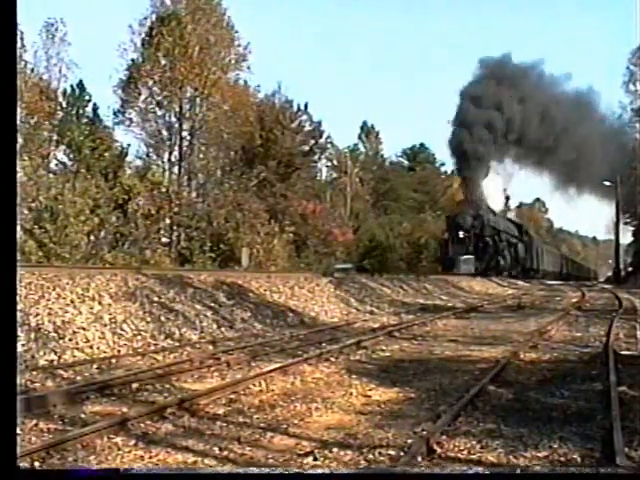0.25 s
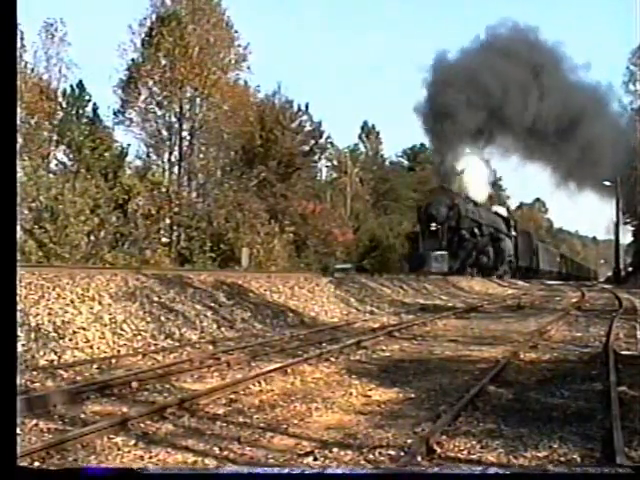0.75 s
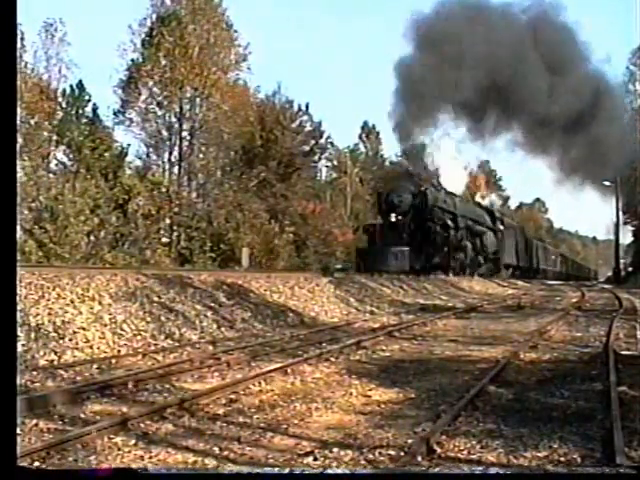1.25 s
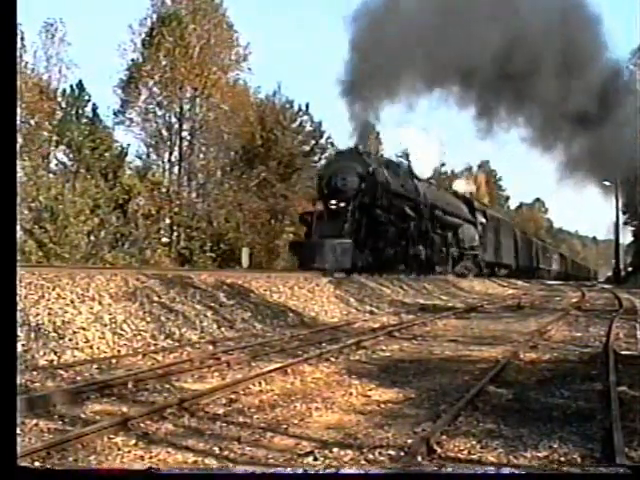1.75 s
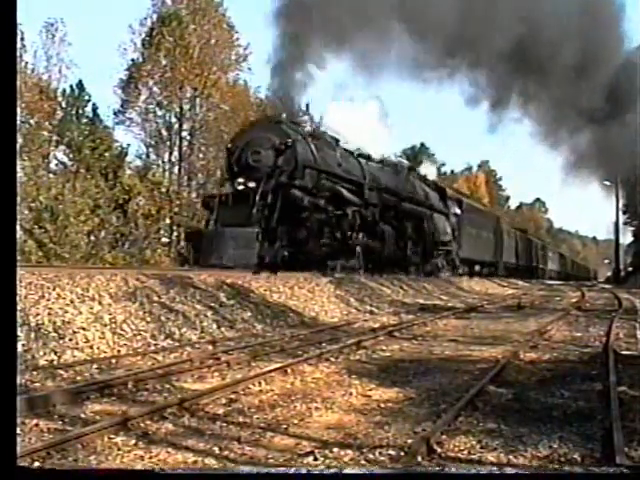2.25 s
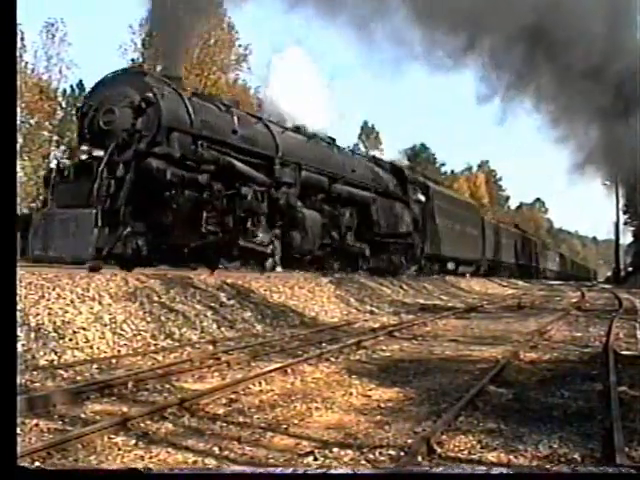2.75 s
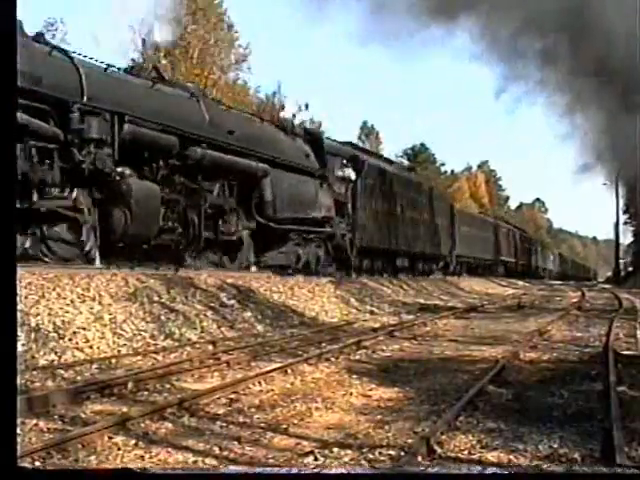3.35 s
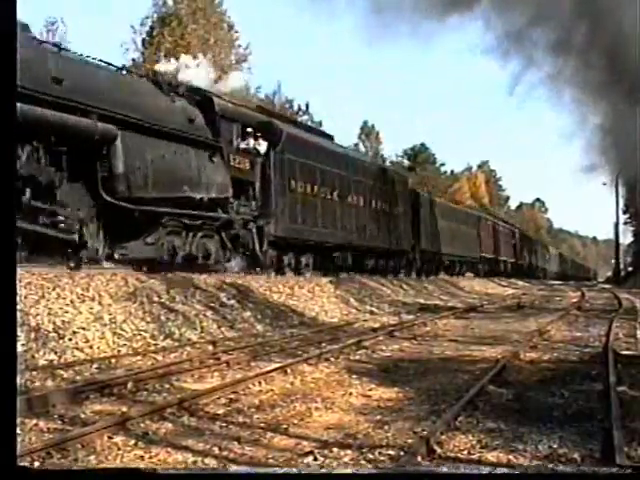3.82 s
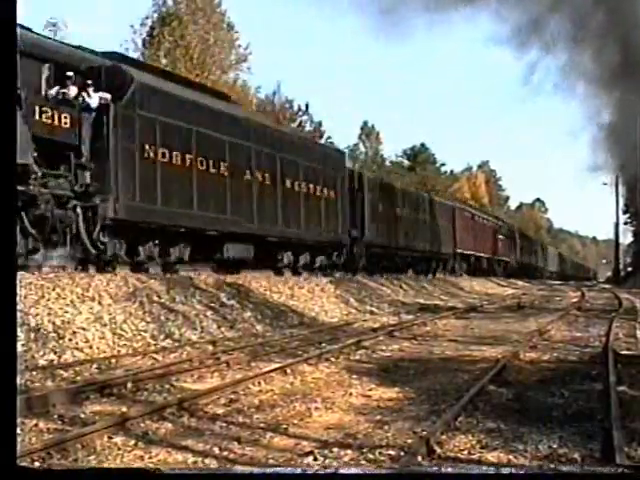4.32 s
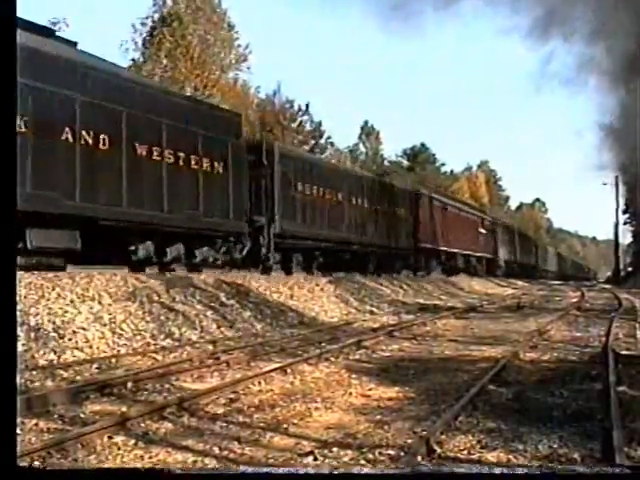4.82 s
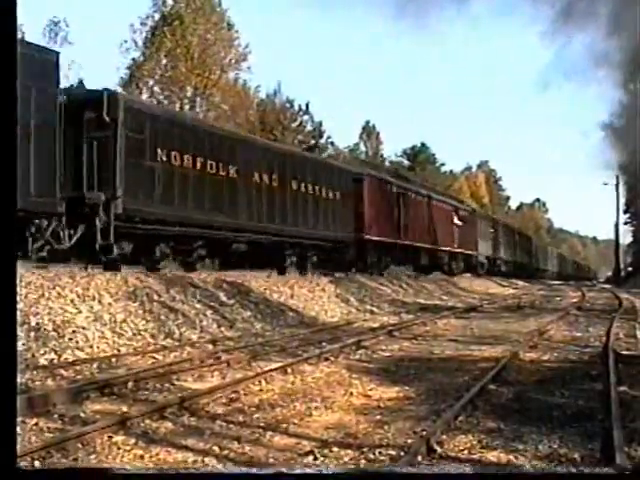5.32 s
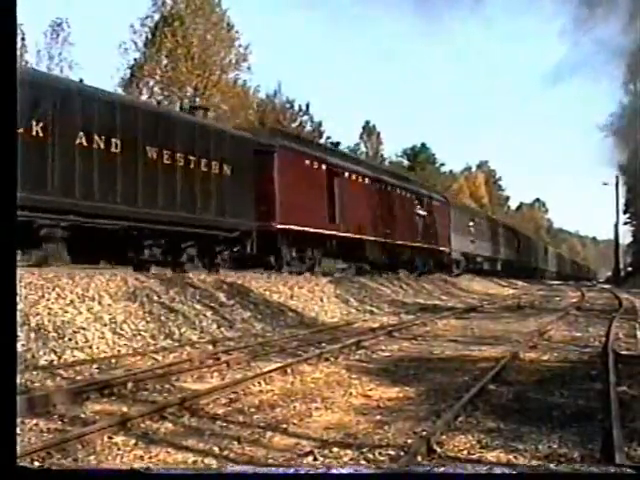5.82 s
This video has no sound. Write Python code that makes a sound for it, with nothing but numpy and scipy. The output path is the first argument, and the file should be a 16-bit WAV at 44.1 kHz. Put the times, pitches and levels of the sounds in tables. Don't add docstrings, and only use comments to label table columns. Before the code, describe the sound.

From the very start a steam locomotive is already blowing its whistle: one sustained, harmonically rich note around F sharp above middle C, rising very slightly as it comes on. The tone flutters, its fundamental and overtones fading and swelling separately, leaning to the left. Behind it steam hisses and wheels rumble, growing brighter and closer through 3 seconds, with low gusts bumping the microphone. At about 3.3 s the note droops quickly and stops. Blurred, detuned echoes from trees hang and die away while, from 3.4 to 4.5 s, wheels and rods knock and ring close by, drifting towards the right, the hiss somewhat reduced. At about 4.5 s a second blast snaps in, scooping up within a tenth of a second to a lower note, near F, that slides slowly down. The rumble recedes, hiss stays airy, and the whistle is still sounding, duller and wavering, when it ends at about 6 s.

```python
import sys
import numpy as np
from scipy import signal
from scipy.io import wavfile
from scipy.ndimage import uniform_filter1d

SR = 44100
rng = np.random.default_rng(int(sys.argv[2]) if len(sys.argv) > 2 else 0)


def master_out(mix):
    frames = np.transpose(np.atleast_2d(mix))
    ceiling = np.clip(frames, -1, 1)
    pcm = np.round(ceiling * 32767).astype(np.int16)
    wavfile.write(sys.argv[1], SR, pcm)


def decibels_to_gain(level_db):
    exponent = np.asarray(level_db, float) / 20
    return 10 ** exponent


N = 268128


def rms_one(x):
    return x / np.sqrt(np.mean(x ** 2) + 1e-20)


def in_time(rows):
    s, *columns = np.transpose(rows)
    return [np.interp(np.arange(N) / SR, s, c) for c in columns]


def swells(rows):
    s, width, *strengths = np.transpose(rows)
    coarse = np.arange(0, N + 64, 64)
    bells = np.exp(-.5 * ((coarse[:, None] / SR - s) / width) ** 2)
    return [np.interp(np.arange(N), coarse, bells @ c) for c in strengths]


def at_hz(points, hz):
    table_hz, values = np.transpose(points)
    return np.interp(np.log(hz), np.log(table_hz), values)


def drift(rate):
    r = np.exp(-80 * np.pi * rate / SR)
    noise = rng.standard_normal(N // 40 + 2002)
    slow = rms_one(signal.lfilter([1], [1, -2 * r, r * r], noise)[2000:])
    return np.interp(np.arange(N) / 40, np.arange(len(slow)), slow)


def later(x, seconds):
    return np.interp(np.arange(N) - seconds * SR, np.arange(N), x)


def panned(x, pan_db):
    left = decibels_to_gain(pan_db / 2)
    return x * np.reshape([left, 1 / left], (2, -1))


# f/Hz, likeness [0-1]
LIKENESS = [(60, 0.4), (130, 0.83), (640, 0.73), (1400, 0.59), (3100, 0.064), (4500, 0.077), (6800, 0.56),
            (15000, 0.18)]


def banded_noise(spectrum, patchy_db, rate):
    out, together = 0, drift(rate)
    edges = 18 * 2 ** np.arange(0, 10.1, .5)
    white = rng.standard_normal((2, 2, N))
    for k, (low, high) in enumerate(zip(edges, edges[1:])):
        hz = np.sqrt(low * high)
        if not spectrum[0][0] < hz < spectrum[-1][0]:
            continue
        band = signal.butter(2, [low, high], "band", fs=SR, output="sos")
        mid, side = signal.sosfilt(band, white[k % 2])
        alike = at_hz(LIKENESS, hz)
        gain = decibels_to_gain(at_hz(spectrum, hz) + patchy_db * (0.37 * together + drift(25.4)))
        out = out + gain * (np.sqrt(1 + alike) * mid + np.sqrt(1 - alike) * side * [[1], [-1]])
    return rms_one(out)


# f/Hz, level/dB per Hz
BUFFET_COLOR = [(18, -4), (30, -9), (60, 2), (100, -0.5), (200, -19)]
# t/s, width/s, level/dB
GUSTS = [(.62, .03, 9), (1.07, 0.027, -2), (2.49, .05, 5), (2.76, 0.034, 5), (3.05, 0.089, 8.5),
         (4.3, .25, 5), (5.75, .2, 4), (4.58, .03, 6), (4.71, .03, 9), (6.08, .03, 4)]


def gusts(jet_db):
    level_db = -57.2 + 1.75 * jet_db + swells(GUSTS)[0]
    return decibels_to_gain(level_db) * banded_noise(BUFFET_COLOR, patchy_db=-3.5, rate=4)


# f/Hz, level/dB per Hz
RUMBLE_COLOR = [(90, -40), (125, -7.5), (200, -0.5), (400, 0), (650, 2), (1200, 0), (2400, -4),
                (4000, -23.5)]
# f/Hz, width/Hz, level/dB
RINGING = [(259, 104, -7), (502, 52, -3), (1020, 20, -10.5)]
# t/s, level/dB
ABREAST = [
    (0, -44.5),
    (3.3, -19.5),
    (3.75, 8),
    (4.45, 11.5),
    (4.6, 2.5),
    (6.08, -4),
]
# t/s, width/s, level/dB
KNOCKS = [(.98, 0.013, -8), (1.05, .02, 0), (2.35, 0.032, 1), (2.52, .025, 0), (3.4, .015, 4),
          (3.49, 0.01, 0.5), (3.81, 0.035, 2.2), (3.98, .02, -0.5), (4.23, 0.016, 2), (4.42, 0.012, 4),
          (4.6, 0.032, -3), (4.66, 0.018, 4)]


def rumble(level_db):
    rolling = banded_noise(RUMBLE_COLOR, patchy_db=2.3, rate=1.7)
    out = rolling.copy()
    abreast_db = in_time(ABREAST)[0]
    for hz, width, db in RINGING:
        r = np.exp(-np.pi * width / SR)
        feedback = [1, -2 * r * np.cos(2 * np.pi * hz / SR), r * r]
        ring = signal.lfilter([(1 - r * r) / 2, 0, (r * r - 1) / 2], feedback, rolling)
        out += decibels_to_gain(db + abreast_db) * ring
    return decibels_to_gain(level_db + swells(KNOCKS)[0] + 6.5) * out


def jet_level(near_db, valve):
    shut_db, late_s, dies_s = -10, .017, .035
    shut = 1 - uniform_filter1d(later(valve, late_s), size=600)
    keep = np.exp(-1 / (dies_s * SR))
    return near_db + shut_db * signal.lfilter([1 - keep], [1, -keep], shut) * shut


# f/Hz, level/dB per Hz
HISS_COLOR = [(90, -14.5), (150, -3), (300, -7.5), (600, -3), (1200, 0), (2500, 3.5), (4000, 0), (6000, 0),
              (8500, -9.5), (11000, -37)]
# f/Hz, level/dB per Hz
AIR_COLOR = [(4120, -17), (7000, 1), (7930, -1.5), (11600, -3.5), (13800, -7), (15100, -5), (15700, -11)]
# t/s, top band level/dB above the hiss
BRIGHT = [(0, -18), (1, -14), (2, -10.5), (3, -7.5), (3.4, -6.5), (4.4, -4.5), (4.6, -1), (5.2, -3.5),
          (6.08, -6.5)]


def steam(hiss_db, turns, valve):
    chop = 1 + .1 * valve * np.sin(2 * np.pi * turns)
    hiss = decibels_to_gain(hiss_db + 8) * banded_noise(HISS_COLOR, patchy_db=1.6, rate=1.4)
    air_db = hiss_db + in_time(BRIGHT)[0] + 9
    air = decibels_to_gain(air_db) * banded_noise(AIR_COLOR, patchy_db=2.5, rate=22.0)
    return chop * (hiss + air)


# t/s, rumble level/dB, left over right level/dB
TRAIN = [(0, -50.5, 4), (.6, -53, 4.5), (1.4, -49, 3.7), (2.17, -46.5, 4.5), (2.45, -43, 2.2),
         (2.8, -41.5, 1.2), (3.1, -44, 2.2), (3.4, -41.5, 3), (3.6, -39.5, -1.5), (3.83, -37, -3.5),
         (4.1, -40.5, -6), (4.25, -40, -7.5), (4.5, -40.5, -8.5), (4.56, -44, -1.1), (5.13, -46.5, -1),
         (5.35, -49, -.6), (6.08, -51, -4.5)]


def train(jet_db, turns, valve):
    rumble_db, pan_db = in_time(TRAIN)
    return panned(rumble(rumble_db) + steam(-38 + jet_db, turns, valve), pan_db)


# multiple of the pitch, level/dB
RADIATED = [(1, -3.5), (2, -12.5), (3, -4.5), (4, -9.5), (5, -8.5), (6, -7), (7, -11.5), (8, -18),
            (9, -22.5), (10, -24)]
# t/s, loudest pitch f/Hz, level/dB, fall/dB per Hz away from that pitch
PASSING = [(0, 367.5, -32, 0), (.6, 368.6, -34, 0), (1.2, 369.5, -30, 0.5), (1.9, 371, -30.5, 0.06),
           (2.6, 371.8, -27, 0.4), (3.22, 372.3, -26, .4), (3.33, 365, -27.5, .1), (3.5, 357, -22, .3),
           (3.9, 356, -19, .2), (4.65, 355, -42, 0.3), (5.3, 351.5, -50, -0.5), (6.08, 347.5, -48, -0.45)]


def tree_echoes(droop, valve, count):
    low_hz, high_hz, t60_s, dull_db_per_s = 348.3, 373.7, 1.46, 12
    loudest_hz, echo_db, fall = in_time(PASSING)
    droop = droop ** .35
    heard_pitch = np.where(valve > 0, droop, 1)
    cycle, out = np.arange(1025) / 1024, 0
    for k, (spot, far, side) in enumerate(rng.random((count, 3))):
        hz = low_hz + (high_hz - low_hz) * (k + spot) / count
        lag = 0.0303 + .6 * far ** 1.5
        shape = 0
        for m, db in RADIATED:
            partial_db = db - dull_db_per_s * lag * min(m - 1, 3) + rng.normal(0, 0.17)
            shape = shape + decibels_to_gain(partial_db) * np.sin(2 * np.pi * (m * cycle + rng.random()))
        turns = np.cumsum(hz * later(heard_pitch, lag) + 0.843 * drift(8.42)) / SR
        gain_db = 3.1 * drift(8.6) - fall * abs(hz - loudest_hz) - 60 * lag / t60_s
        gain = later(valve, lag) * decibels_to_gain(gain_db)
        out = out + panned(gain * np.interp(turns % 1, cycle, shape), 14 * (side - .5))
    return decibels_to_gain(echo_db - 4) * out


PASSED_S = 4.0
VOICE = [
    (-21.5, 0.64, -25.5, -0.5),
    (-28.5, 0.93, -35.5, 7.5),
    (-29.5, 1.31, -24.5, 11),
    (-30, 1.19, -31, 11),
]
# t/s, width/s, level/dB, left-right sway level/dB
FIRST_FADES = [(.1, .12, -14, 6), (.33, .04, -10.5, 3), (.66, .025, -7, .1), (.96, .02, -4, 1.5),
               (1.15, .11, -11, 6), (1.27, .035, -9, 3), (1.4, .04, -7, 3), (1.5, .07, -4, 2.1),
               (1.92, .025, -7, .1), (2.12, .05, -17, 5), (2.355, .035, -11, .1), (2.86, .03, -6, 1.1),
               (3.06, .03, -9, 1.1), (3.285, .008, -6, .1), (3.31, .012, 1.5, .1), (4.55, .05, -19, -2.1),
               (4.775, .014, -7, 0), (4.885, .022, -19, 0), (4.92, .07, -9, 0), (5.38, .07, -4, -5),
               (5.5, .045, -21, -14), (5.585, .025, -7, -7)]
# t/s, width/s, level/dB
SECOND_FADES = [(0, 0.08, -6), (.43, 0.032, -4.5), (.86, 0.081, -11), (1.16, 0.047, -18),
                (1.445, 0.034, -14), (1.62, 0.055, -5), (1.78, 0.038, -9), (2.26, 0.021, -3),
                (2.56, 0.06, 4), (2.72, .03, -4), (3.0, .06, -12.5), (3.26, 0.057, -21), (4.55, 0.043, -17),
                (4.74, 0.053, 3), (4.97, 0.1, -5.5), (5.12, 0.019, -9), (5.24, 0.018, -5),
                (5.44, 0.036, -7)]
# t/s, width/s, level/dB
THIRD_FADES = [(.3, 0.02, -16), (.68, 0.019, -7), (.98, 0.02, -6), (1.61, 0.015, -3), (1.73, 0.015, 9),
               (1.9, 0.034, 6.5), (2.02, 0.022, -14), (2.36, 0.012, -15), (2.6, 0.04, 1), (2.84, 0.021, 5),
               (3.07, 0.055, 8), (3.2, 0.035, 7), (3.318, 0.0089, -10), (4.526, 0.0081, 2.5),
               (4.548, 0.0061, -6), (4.67, 0.011, -15), (4.72, 0.012, -14), (4.87, 0.037, 5),
               (5.2, .08, -4.5), (5.45, 0.092, -14), (6.05, 0.069, 8.5)]
# t/s, width/s, level/dB
UPPER_FADES = [(.11, .05, -1.5), (.45, 0.036, -7), (3.31, .02, -14), (4.52, 0.0073, -6), (4.59, 0.017, -5),
               (5.47, 0.039, -16), (6.08, .08, -15)]


def partial_levels(near_db):
    since = np.arange(N) / SR - 4.55
    coming = since < PASSED_S - 4.55
    fades = FIRST_FADES, SECOND_FADES, THIRD_FADES, UPPER_FADES
    levels = []
    for (coming_db, share, going_db, loss_db), rows in zip(VOICE, fades):
        level_db = np.where(coming, coming_db + share * near_db, going_db - loss_db * since)
        levels.append(level_db + swells(rows)[0])
    return levels


# multiple of the pitch, approaching level/dB, leaving level/dB
UPPER = [(4, -4, -7), (5, -6, -6.5), (6, -9.5, -4), (7, -8, -4), (8, -17, -9), (9, -15.5, -13),
         (10, -20, -9.5), (11, -23, -13), (12, -24, -15.5), (13, -21, -12.5)]
# t/s, width/s, level/dB, multiple of the pitch
LONE_FADES = [(1.02, 0.039, 6.5, 4), (1.66, 0.044, 8, 4), (2.3, 0.073, 3.5, 4), (2.46, 0.041, -10, 4),
              (3.2, 0.018, -15, 4), (4.64, 0.028, 7, 4), (1.97, 0.014, -11, 5), (2.87, 0.019, 7, 5),
              (3.2, 0.081, 5.5, 5), (4.75, 0.044, -11, 5), (5.3, 0.022, 8.5, 5), (5.7, 0.089, 14.5, 5),
              (2.97, .03, 9, 6), (4.8, 0.062, -16, 6), (5.08, 0.075, 3, 6), (5.2, 0.21, -0.5, 7)]


def whistle(turns, droop, near_db, pan_db):
    first_db, second_db, third_db, upper_db = partial_levels(near_db)
    pan_db = pan_db + swells(FIRST_FADES)[1]
    partials = [(1, first_db, 0.59), (2, second_db, 0.67), (3, third_db, 0.86)]
    passed = np.arange(N) > PASSED_S * SR
    for k, coming_db, leaving_db in UPPER:
        weak_db = 32 * max(k - 6, 0) * (1 - droop)
        partials.append((k, upper_db + np.where(passed, leaving_db, coming_db) - weak_db, 3.5))
    out = 0
    for k, level_db, flicker_db in partials:
        lone = [row[:3] for row in LONE_FADES if row[3] == k]
        if lone:
            level_db = level_db + swells(lone)[0]
        skew = 0.37 * drift(0.29) * [[1], [-1]]
        shake = .05 * k * drift(44)
        tone = np.sin(2 * np.pi * (k * turns + rng.random()) + skew + shake)
        gain = np.sqrt(2) * decibels_to_gain(level_db + flicker_db * drift(14.4))
        out = out + panned(gain * tone, pan_db + 0.37 * drift(11.0))
    return out


# t/s, level/dB, whistle left over right level/dB
NEARNESS = [(0, -9, 7.5), (.27, -6.5, 5), (.6, -8.5, 10.5), (1.0, -6.5, 4.5), (1.45, -5.5, 6),
            (1.7, -5, 5.5), (2.17, -2.5, 2), (2.6, -0.2, 0.5), (3.3, -0.1, 0.5), (3.9, 1, 2),
            (4.55, 0, 0.5), (5.13, -0.9, -1), (5.35, -2, -2.5), (6.08, -1.5, -3)]
# t/s, opening [0-1]
VALVE = [
    (0, 0.95),
    (3.3, 0.99),
    (3.33, 0),
    (4.515, 0.01),
    (4.519, 1),
    (6.08, 1),
]
# t/s, share of full pitch
PRESSURE = [(0, 1), (3.21, 1), (3.235, .993), (3.265, .976), (3.28, .942), (3.3, .884), (3.33, .82),
            (4.505, .765), (4.52, .79), (4.545, .847), (4.575, .955), (4.59, .986), (4.62, 1), (6.08, 1)]
# t/s, f/Hz
DOPPLER = [(0, 366.6), (.8, 369.2), (1.7, 370.4), (2.9, 372.3), (3.3, 372.5), (3.9, 364), (4.65, 356),
           (5.0, 352.5), (5.3, 349.9), (5.6, 347.9), (6.08, 346.3)]


def scene():
    near_db, pan_db = in_time(NEARNESS)
    valve, droop = in_time(VALVE)[0], in_time(PRESSURE)[0]
    pitch_hz = in_time(DOPPLER)[0] * droop + .4 * drift(9.15)
    turns = np.cumsum(pitch_hz) / SR
    jet_db = jet_level(near_db, valve)
    background = gusts(jet_db) + train(jet_db, turns, valve) + tree_echoes(droop, valve, count=24)
    return background + valve * whistle(turns, droop, near_db, pan_db)


def gain_control(x):
    knee_db, squeeze, release_db_per_s = -18, 0.19, 124
    level_db = 20 * np.log10(abs(x).max(axis=0) + 1e-6)
    ramp = release_db_per_s * np.arange(N) / SR
    held_db = np.maximum.accumulate(level_db + ramp) - ramp
    cut_db = squeeze * np.maximum(held_db - knee_db, 0)
    return x * decibels_to_gain(-signal.lfilter([.01], [1, -.99], cut_db))


def top_cut(x):
    return signal.sosfilt(signal.butter(12, 15810, fs=SR, output="sos"), x)


def record(dry):
    trail = np.roll(dry[0], 2) - dry[0]
    low_pass = signal.butter(4, 6000, fs=SR, output="sos")
    left = dry[0] + signal.sosfiltfilt(low_pass, trail)
    ports = gain_control(np.array([left, dry[1]]))
    top = .175
    return top_cut(top * np.tanh(ports / top))


dry = scene()
out = record(dry)
master_out(out)
```